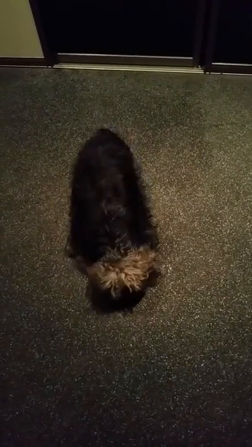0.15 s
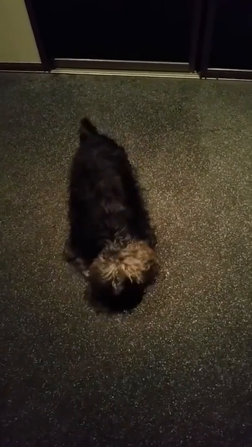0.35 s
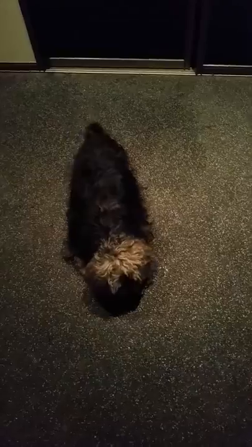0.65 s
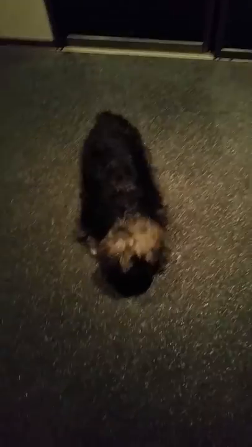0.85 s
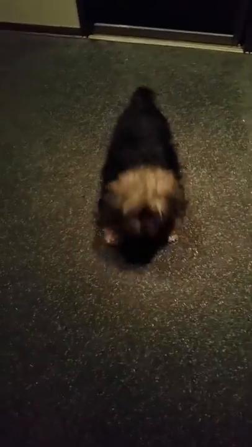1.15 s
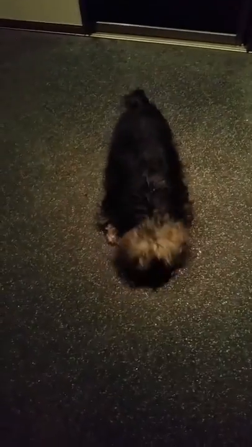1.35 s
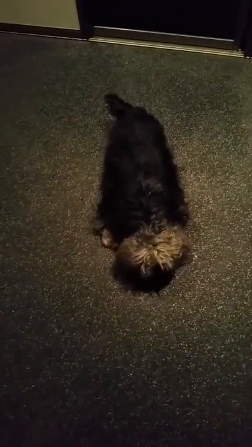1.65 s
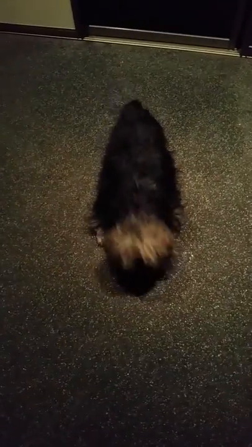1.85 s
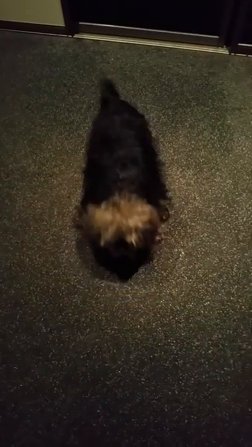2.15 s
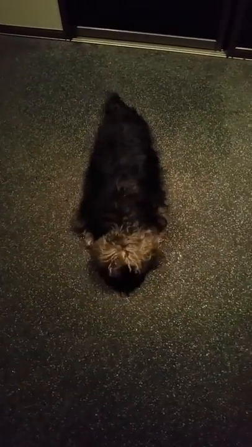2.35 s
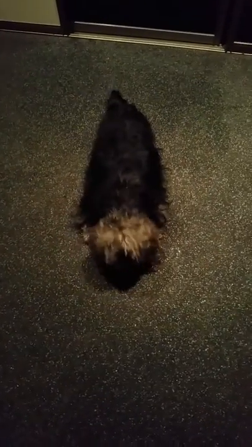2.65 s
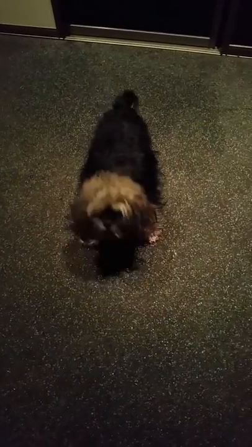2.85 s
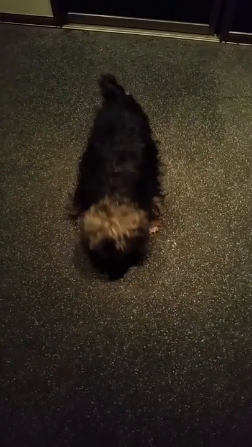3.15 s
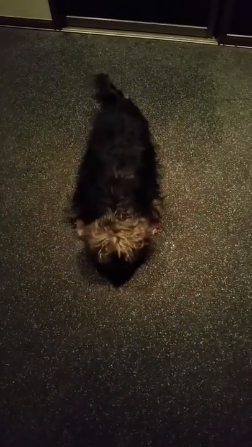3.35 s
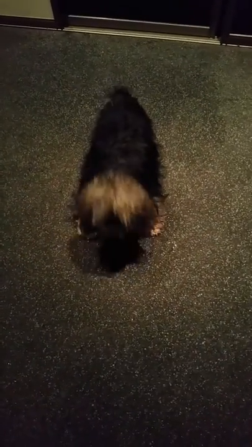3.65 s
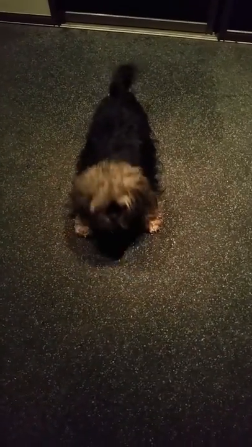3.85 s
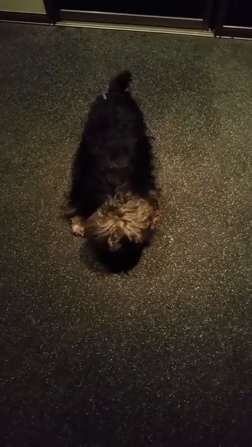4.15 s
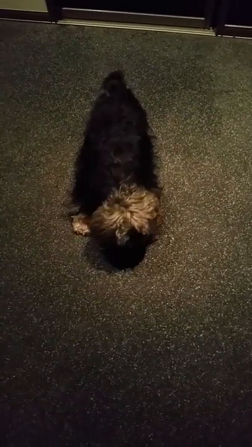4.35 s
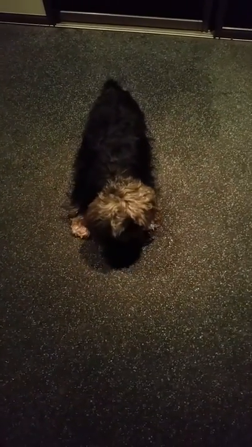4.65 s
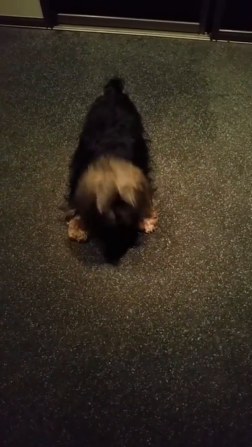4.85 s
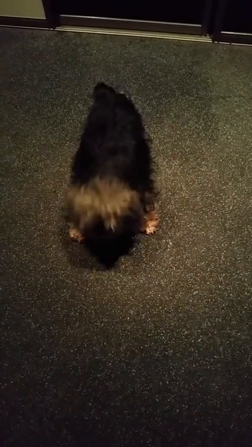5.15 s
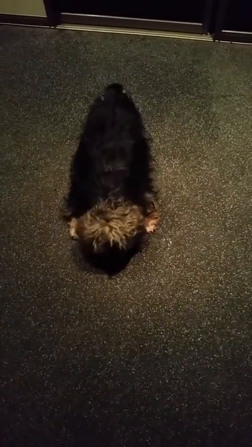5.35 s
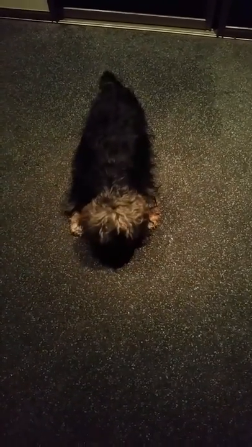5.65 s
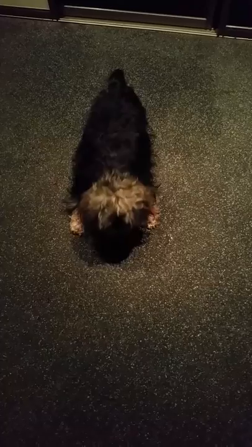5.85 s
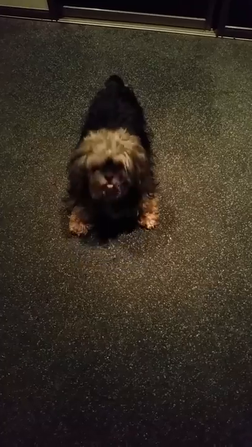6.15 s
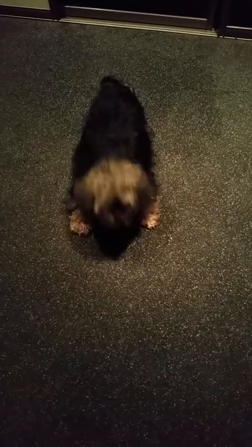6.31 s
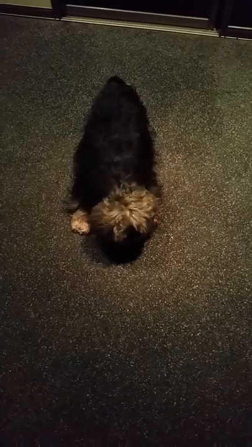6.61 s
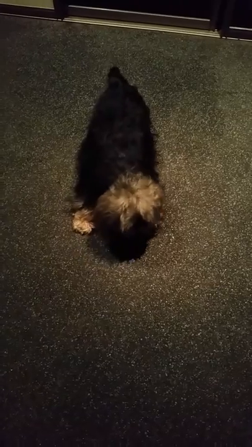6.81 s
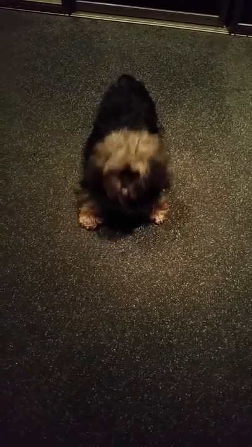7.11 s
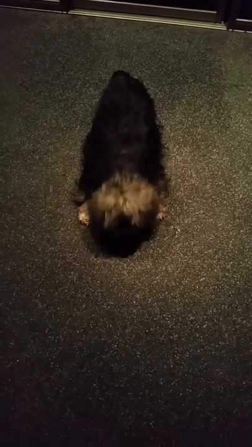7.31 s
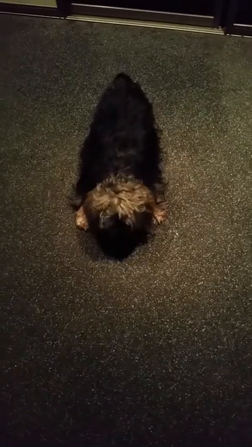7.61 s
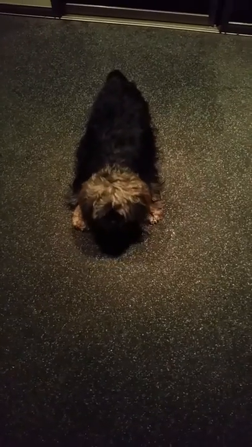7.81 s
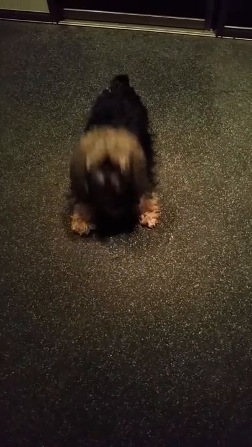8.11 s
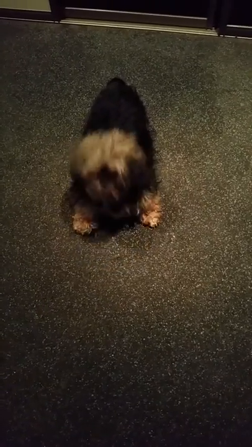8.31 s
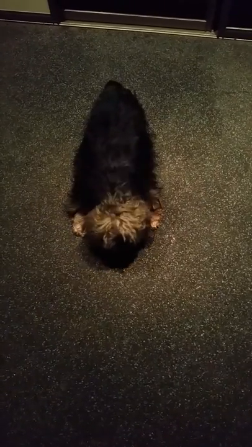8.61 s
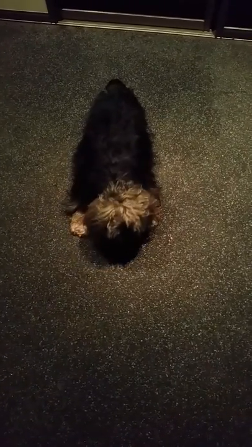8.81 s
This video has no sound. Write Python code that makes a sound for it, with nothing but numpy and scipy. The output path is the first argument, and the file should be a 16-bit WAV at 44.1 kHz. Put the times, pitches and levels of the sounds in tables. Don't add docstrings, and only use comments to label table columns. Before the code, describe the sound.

A small dog close by snorts and sniffs wetly, then lets out quick, thin whines around one second's start, sliding and nearly pure. Soft buzzy grunts and one sharper little yelp follow, with more whines in the middle and sparse fainter sounds at the end. The quiet hard hall rings briefly after each note. A hand-held stereo microphone with noise suppression lets low rumble swell with each burst.

```python
import sys
import numpy as np
from scipy import signal
from scipy.fft import rfft, irfft, next_fast_len
from scipy.io import wavfile
from scipy.ndimage import uniform_filter1d, map_coordinates

SR = 44100
rng = np.random.default_rng(int(sys.argv[2]) if len(sys.argv) > 2 else 0)


def volts(x):
    e = np.asarray(x, float) / 20
    return 10 ** e


def transcribe(u):
    v = np.clip(np.atleast_2d(u).T, -1, 1)
    q = np.round(v * 32767).astype(np.int16)
    wavfile.write(sys.argv[1], SR, q)


N = 395577
STEP = 16
SNORT_FALL_DB_PER_S = 228

# (time [s], length [s], closed level [dB], open level [dB])
GRUNTS = [
    (1.455, 0.05, -52, -59),
    (2.346, 0.048, -62.5, -50),
    (3.241, 0.053, -51.5, -35.5),
    (4.087, 0.053, -60, -46),
    (5.31, .053, -52, -59.5),
    (6.51, .075, -53, -50),
    (8.818, 0.055, -58, -56),
]
# (time [s], peak [dB], floor ring [Hz], length [s])
PAWS = [
    (2.63, -53.5, 162.2, 0.055),
    (6.388, -65, 206, 0.021),
]


def unit(x):
    return x / np.sqrt(np.mean(x ** 2) + 1e-20)


def along(points, hz):
    f, v = np.transpose(points)
    return np.interp(np.log(hz + 1), np.log(f + 1), v)


def wobble(rate):
    knots = rng.standard_normal(int(N * rate / SR) + 4)
    return map_coordinates(knots, [np.arange(N) * rate / SR])


def sides(db):
    return volts(np.array([db / 2, -db / 2]))


def rush(spectrum, balance, alike):
    m = next_fast_len(N)
    hz = np.fft.rfftfreq(m, 1 / SR)
    turn = np.arccos(np.clip(along(alike, hz), -1, 1)) / 2
    mid, side = rfft(rng.standard_normal((2, m))) * [np.cos(turn), np.sin(turn)]
    colour = volts(along(spectrum, hz)) * sides(along(balance, hz))
    pair = irfft(np.array([mid + side, mid - side]) * colour, m)[:, :N]
    return pair / np.std(pair.mean(0))


def mottled(x, depth_db):
    z = signal.stft(x, nperseg=512)[2]
    field = uniform_filter1d(rng.standard_normal(z.shape), size=5, axis=1)
    field = uniform_filter1d(field, size=8, axis=2)
    return unit(signal.istft(z * volts(depth_db * unit(field)), nperseg=512)[1][:, :N])


def burst(s, rise, hold, fall_db_per_s):
    rise_db = 20.5
    t = np.arange(0, N, STEP) / SR - s
    rise = max(rise, 1e-3)
    rising = -rise_db * np.clip(1 - t / rise, 0, 1)
    falling = -fall_db_per_s * np.clip(t - rise - hold, 0, None)
    return (t > 0) * volts(rising + falling)


def airflow():
    # (time [s], hold [s], hiss [dB], wheeze under the hiss [dB])
    snorts = [(-.01, 0.0081, -69.5, -22.5), (0.057, 0.0043, -53.5, -23.5), (.54, .13, -56, -24),
              (0.938, 0.027, -47, -16.5), (1.05, .005, -35.5, -17), (1.074, 0.0074, -35.5, -14.5),
              (1.338, 0.003, -75, -8), (1.481, 0.51, -68, -26), (1.709, .02, -44.5, -22),
              (1.751, 0.016, -44, -15.5), (2.316, 0.0046, -55, -20), (2.332, 0.026, -49, -15.5),
              (3.164, .004, -87.5, -25), (4.102, 0.098, -72, -24), (6.53, .02, -69.5, -40),
              (6.558, 0.12, -63, -38), (6.971, 0.1, -64.5, -27), (7.05, 0.033, -58, -25.5),
              (8.127, 0.053, -72.5, -30), (8.175, .1, -66, -25), (8.8, 0.043, -82, -24),
              (8.822, .11, -70.5, -27.5)]
    # (time [s], rise [s], hold [s], hiss [dB], wheeze under the hiss [dB])
    sniffs = [(0.128, 0.022, .02, -65.5, -19), (.36, .09, 0.012, -73, -30),
              (0.608, 0.13, .17, -48.5, -16.5), (2.402, 0.031, 0.11, -59, -18),
              (2.55, 0.063, 0.045, -66, -21.5), (3.22, .11, 0.024, -60, -17.5),
              (3.289, 0.081, .11, -54, -22), (4.17, 0.099, 0.071, -62, -19),
              (4.328, .03, 0.091, -57.5, -21.5), (4.538, 0.055, 0.058, -66, -24),
              (5.294, .11, 0.15, -68.5, -38), (5.489, 0.091, 0.11, -62, -33),
              (5.715, .03, 0.071, -58.5, -27), (6.361, 0.071, 0.0089, -87, -26.5),
              (6.62, .17, 0.14, -63, -33), (8.351, .04, 0.032, -79.5, -29), (8.622, .06, 0.009, -92.5, -25)]
    # (hiss [dB], nasal rush [dB])
    rush_law = [(-102, -95), (-78.5, -78), (-61.5, -73), (-28, -49)]
    snort_rise_s, sniff_fall_db_per_s = 0.02, 145
    linger_db, linger_db_per_s = -19, 50
    puff_db, puff_db_per_s = -40, 97.5

    hiss, wheeze, tight_db = volts(-106), volts(-105), -25
    breaths = [(SNORT_FALL_DB_PER_S, s, snort_rise_s, *rest) for s, *rest in snorts]
    breaths += [(sniff_fall_db_per_s, *row) for row in sniffs]
    for fall, s, rise, hold, db, wheeze_db in breaths:
        blow = volts(db) * burst(s, rise, hold, fall)
        heard = blow + volts(db + linger_db) * burst(s, rise, hold, linger_db_per_s)
        tight_db = np.where(heard > hiss, wheeze_db, tight_db)
        hiss = np.maximum(hiss, heard)
        wheeze = np.maximum(wheeze, volts(wheeze_db) * blow)
    hiss_db = 20 * np.log10(hiss)
    puffs = sum(volts(open_db + puff_db) * burst(s, length, 0, puff_db_per_s) for s, length, _, open_db in GRUNTS)
    rush_db = 20 * np.log10(volts(np.interp(hiss_db, *np.transpose(rush_law))) + puffs)
    return hiss_db, rush_db, 20 * np.log10(wheeze), tight_db


def nose(hiss_db, rush_db, wheeze_db, tight_db):
    # (frequency [Hz], density [dB per Hz])
    hard_hiss = [(8300, -68.5), (8900, -18.5), (10100, 1.5), (11200, 0.5), (12000, -5.5), (13000, -6),
                 (14200, -7), (14800, -12.5)]
    # (frequency [Hz], density [dB per Hz])
    soft_hiss = [(8300, -67.5), (8900, -18), (9500, -5), (10500, 4.5), (11500, -2), (12500, -5),
                 (14000, -21.5), (14800, -18.5)]
    # (frequency [Hz], density [dB per Hz])
    rush_colour = [(1100, -32), (1800, 4), (2400, -5.5), (2810, 0.5), (3200, -4.5), (3950, 6.5), (5300, -3),
                   (6200, -15.5), (6700, -57)]
    # (frequency [Hz], density [dB per Hz])
    wheeze_colour = [(4200, -40.5), (5300, -4.5), (6300, -8.5), (6740, -16), (7000, -6.5), (7300, -6),
                     (7900, -10.5), (8900, -4.5), (9500, -42)]
    # (frequency [Hz], left-right [dB])
    nose_sides = [(2000, -3), (3000, 5.5), (4400, 6), (6000, -9), (8000, -6), (10500, 0), (14000, -1)]
    # (time [s], peak [dB], left-right [dB])
    smacks = [(0.0524, -77, -3), (0.0591, -31.5, -11), (0.064, -44, -15), (0.0714, -55, -3),
              (0.0954, -55, -4), (0.9667, -49, -2.5), (0.9881, -45, -8.5), (1.7144, -70, -7),
              (1.717, -34, -3), (2.3307, -45, 14), (1.349, -49, -3), (6.976, -46.5, 1), (3.1732, -57.5, -9)]
    apart = [(1000, 0.0058)]

    spit = volts(1.0 * wobble(900) + 0.52 * wobble(65))
    tightness = uniform_filter1d(tight_db + 27, size=900) / 22
    force = np.clip(0.65 + (hiss_db + 59.5) / 60 + tightness, 0, 1)
    hiss = force * rush(hard_hiss, nose_sides, apart)
    hiss += np.sqrt(1 - force ** 2) * rush(soft_hiss, nose_sides, apart)
    air = volts(hiss_db + 1.0) * mottled(spit * hiss, depth_db=4.0)
    air += volts(rush_db + 2.2 * wobble(40)) * rush(rush_colour, nose_sides, apart)
    air += volts(wheeze_db + 5.5) * mottled(rush(wheeze_colour, nose_sides, apart), depth_db=4.5)
    t = np.arange(130) / SR
    for s, db, pan_db in smacks:
        tick = volts(db - 3.0 - 60 * t / 0.0075) * np.sin(2 * np.pi * 10500 * t)
        air[:, round(s * SR):][:, :len(t)] += tick * sides(pan_db)[:, None]
    return air


def opening(rush_db):
    # (nasal rush [dB], rumble let through [dB])
    rumble_law = [(-104, -75), (-75, -63.5), (-67, -57.5), (-54, -55)]
    opening_s, paw_opens_db = 0.061, -23
    presses = sum(volts(db + paw_opens_db) * burst(s, 0.0039, length, SNORT_FALL_DB_PER_S)
                  for s, db, _, length in PAWS)
    busy_db = 20 * np.log10(volts(rush_db) + presses)
    busy_db = uniform_filter1d(busy_db, size=max(1, round(opening_s * SR / STEP)))
    return np.interp(busy_db, *np.transpose(rumble_law))


def background(rumble_db):
    # (frequency [Hz], density [dB per Hz])
    quiet = [(22, -15.5), (36, -13), (60, -8), (125, -9.5), (208, -12.5), (600, -14.5), (1270, -39.5),
             (1900, -32), (2450, -44), (3950, -24), (5200, -40.5), (7800, -66), (10500, -46), (14800, -50)]
    # (frequency [Hz], left-right [dB])
    quiet_sides = [(60, -1.5), (110, 5), (200, -0.5), (380, 0), (700, 5.5), (1290, -7.5), (2380, 21),
                   (4400, 15), (8120, 8.5), (15000, 15.5)]
    # (frequency [Hz], density [dB per Hz])
    rumble_colour = [(32, -52), (55, 0), (123, -4.5), (210, -3), (448, -7.5), (486, -6), (681, -9),
                     (1110, -14.5), (1500, -21), (2600, -33), (3380, -17), (5720, -120)]
    # (frequency [Hz], left-right likeness [-1..1])
    alike = [(60, 0.87), (240, 0.38), (950, 0.22), (3770, 0.01), (15000, -0.14)]
    # (frequency [Hz], width [Hz], level [dB],
    # left-right [dB])
    narrow_bands = [(206.1, 11, -80.5, -3), (1845, 140, -95, 4), (4020, 300, -83.5, 20.5),
                    (12600, 200, -99, 0)]
    hum_hz, hum_level_db, hum_follows, hum_wander_db = 46, -71, 0.43, 2
    quiet_db = -66

    hum_db = hum_level_db + hum_follows * (rumble_db - rumble_db.mean()) + hum_wander_db * wobble(5)
    hum_phase = 2 * np.pi * np.cumsum(hum_hz * (1 + 0.023 * wobble(1.7))) / SR
    hum = np.sin(hum_phase + 0.5 * np.array([wobble(1.8), wobble(1.5)]))
    port_drift_db = 1.5 * np.array([wobble(12.0), wobble(16.0)])
    hum = volts(hum_db + 5.0 + port_drift_db) * hum * sides(-2.1)[:, None]

    still = volts(quiet_db - 6.5) * rush(quiet, quiet_sides, alike)
    rumble = volts(rumble_db - 2.0) * rush(rumble_colour, [(100, -7.0), (1000, 6.5)], alike)
    drones = 0
    for hz, w, db, pan_db in narrow_bands:
        band = [(hz - 3 * w, -120), (hz - 2 * w, -30), (hz, 0), (hz + 2 * w, -30), (hz + 3 * w, -120)]
        drones = drones + volts(db) * rush(band, [(hz, pan_db)], alike)
    return still + rumble + volts(0.59 * (rumble_db + 72.5)) * drones + hum


def hall(x, gap):
    # (frequency [Hz], t60 [s])
    decay = [(300, 0.61), (1200, 0.73), (4000, 0.37), (12000, 0.6)]
    # (hold [s], fall [s], depth [dB])
    closing = (0.033, 0.12, -14)
    hz, t, z = signal.stft(rng.standard_normal((2, SR // 2)), SR, nperseg=256)
    tail = signal.istft(z * volts(-60 * t / along(decay, hz)[:, None]), SR, nperseg=256)[1]
    late = np.pad(x, (round(gap * SR), 0))
    echo = signal.fftconvolve(late[None], tail / np.linalg.norm(tail[0]), axes=1)
    hold, fall, depth_db = closing
    after = (np.arange(echo.shape[1]) - len(x)) / SR - hold
    return echo * volts(depth_db * np.clip(after / fall, 0, 1))


def calls(notes, poses, overtones, colour, jitter, lag):
    out, shake, flutter = np.zeros((2, N + SR)), wobble(300), wobble(500)
    for note, (*_, pan_db, bright_db, wet_db) in zip(notes, poses):
        s, hz, db, roughness, flare_db, octave_db = np.transpose(note)
        start = round(s[0] * SR)
        t = np.arange(start, round(s[-1] * SR) + 260) / SR
        here = slice(start, start + len(t))
        rough = np.clip(np.interp(t, s, roughness), 0, 1)
        pitch = np.interp(t, s, hz) * (1 + jitter * rough * shake[here])
        phase = 2 * np.pi * np.cumsum(pitch) / SR
        edges = np.clip((t - t[0]) / 0.0057, 0, 1) * np.clip((t[-1] - t) / 0.0078, 0, 1)
        shape = np.sqrt(2) * volts(np.interp(t, s, db)) * edges * (1 - rough + rough * flutter[here])
        overtone_db = bright_db + np.interp(t, s, flare_db)
        direct = np.zeros((2, len(t)))
        for k, g in enumerate(overtones, 1):
            gain_db = g + overtone_db * (k > 1) + octave_db[0] * (k == 2) + along(colour, k * pitch)
            direct += shape * volts(gain_db) * np.sin(k * (phase + np.array([[-lag], [lag]])))
        echo = volts(wet_db) * hall(direct[0], gap=.006)
        echo[:, :len(t)] += direct
        out[:, start:start + echo.shape[1]] += echo * sides(pan_db)[:, None]
    return out[:, :N]


def whine(row, pose):
    slide_from, dip_from, dip_to = 0.26, .5, .75
    early_slide, leaving_db = 0.21, -9.5
    (s, length, first, dip, last), (first_db, last_db) = row, pose[:2]
    shares = np.array([0, slide_from, dip_from, dip_to, 1])
    pitch = [first, first + early_slide * (dip - first), dip, dip, last]
    level = np.interp(shares, [0, dip_to, 1], [first_db, last_db, last_db + leaving_db])
    return np.transpose([s + length * shares, pitch, level, 0 * shares + 0.064, 0 * shares, 0 * shares])


def whines():
    # (time [s], length [s], first pitch [Hz], pitch at the dip [Hz], last pitch [Hz])
    whistles = [(0.387, 0.037, 980, 1147, 1155), (0.501, 0.06, 1160, 1240, 1310),
                (0.576, 0.065, 1414, 1317, 1460), (0.705, 0.068, 1437, 1043, 1500),
                (0.833, 0.057, 1462, 1132, 1343), (1.607, 0.0485, 1150, 1041, 1275),
                (1.726, .046, 1574, 1134, 1462), (4.246, 0.056, 1403, 1356, 1410),
                (4.383, 0.05, 1420, 1382, 1370), (4.592, 0.037, 1370, 1273, 1277),
                (5.527, .046, 1276, 1242, 1266), (5.651, 0.06, 1332, 1177, 1170),
                (5.75, .056, 1258, 937, 885), (5.936, .02, 975, 1024, 1010),
                (6.855, 0.013, 1165, 1162, 1190), (6.884, .016, 1166, 1138, 1100)]
    # (first level [dB], last level [dB], left-right [dB], overtones [dB], hall [dB])
    poses = [(-66, -59.5, -5.5, -20.5, 2), (-59.5, -66.5, -4, -18, 3.5), (-51, -42, -9, -5, -0.5),
             (-34.5, -41, -9.5, -2, 0.5), (-36, -31.5, -9, 3.5, -2.5), (-51, -39.5, -4, -11, -2),
             (-53, -30.5, -6, 7.5, -1.5), (-48, -41.5, -6, -3, -3.5), (-36.5, -31, -6.5, -12, -8.5),
             (-52.5, -41, -3.5, -6, -1.5), (-58.5, -47, -11, -19, -3), (-57, -42.5, -8.5, -14, 0.5),
             (-44, -44.5, -5, -1, -0.5), (-44.5, -47.5, -2, -7, -3.5), (-61, -57, -3, -30, -7),
             (-51, -52.5, -7, -22, 1)]
    overtones = [-0.5, -16.5, -29, -30.5]
    # (frequency [Hz], gain [dB])
    snout = [(1000, -0.5), (1900, 4), (2300, -9), (2800, -7.5), (4500, 1.5)]
    return calls(map(whine, whistles, poses), poses, overtones, snout, jitter=0.23, lag=0.61)


def grunt(row, pitch, octave_db):
    jaw_loosens, jaw_open = .55, .76
    swell_db_per_octave = 60
    s, length, closed_db, open_db = row
    first_db = closed_db - swell_db_per_octave * np.log2(pitch[1] / pitch[0])
    times = s + length * np.array([0, jaw_loosens, jaw_open, 1])
    level = [first_db, closed_db, open_db, open_db]
    roughness = [.06, .06, .35, .4]
    flare_db = [0, 3.5, 2.5, -14]
    return np.transpose([times, pitch, level, roughness, flare_db, 4 * [octave_db]])


def grunts():
    # (first [Hz], as the jaw loosens [Hz], jaw open [Hz], last [Hz])
    pitches = [(612, 630, 800, 960), (600, 700, 920, 960), (635, 745, 880, 960), (680, 735, 860, 980),
               (510, 575, 650, 555), (345, 440, 565, 555), (535, 500, 595, 545)]
    octaves_db = [-2, 4, -8, 3.5, -3, 1.5, 0]
    # (left-right [dB], overtones [dB], hall [dB])
    poses = [(-5, -13.5, 2.5), (-7.5, -9, 1), (-7, 5, 0), (-5, 0.5, 0.5), (-6, -10, 3.5), (-4.5, -11.5, 1),
             (-6, -11, 2)]
    overtones = [0.5, 0, -3.5, -17.5, -15.5, -26.5]
    # (frequency [Hz], gain [dB])
    throat = [(300, 8), (900, 0), (1350, 9), (1700, -1), (2300, -8.5), (3100, -8.5), (4200, 5), (4800, -49)]
    notes = map(grunt, GRUNTS, pitches, octaves_db)
    return calls(notes, poses, overtones, throat, jitter=0.14, lag=0.14)


def paws():
    out = np.zeros((2, N))
    for s, db, hz, length in PAWS:
        t = np.arange(round(length * SR)) / SR
        note = np.sin(2 * np.pi * hz * t) + 0.33 * np.sin(2 * 2 * np.pi * hz * t)
        note *= volts(db + 7.5) * np.sin(np.pi * t / length) ** 0.063
        out[:, round(s * SR):][:, :len(t)] += note * sides(-2.7)[:, None]
    return out


def scene():
    def every_sample(levels):
        return np.repeat(levels, STEP, axis=1)[:, :N]

    flow = airflow()
    hall_noise = background(*every_sample([opening(flow[1])]))
    return nose(*every_sample(flow)) + hall_noise + whines() + grunts() + paws()


def band_limit(x):
    return signal.sosfilt(signal.butter(12, 15680, fs=SR, output="sos"), x)


def record(dry):
    # (from [Hz], to [Hz], level under the hiss [dB])
    masked = (5900, 9300, -16)
    top_hz = 14600
    hz, _, z = signal.stft(dry, SR, nperseg=2048)
    power = uniform_filter1d(np.abs(z) ** 2, size=14, axis=1)
    low_hz, high_hz, under_db = masked
    mask = power[:, hz > high_hz][:, :200].mean(1, keepdims=True) * volts(2 * under_db)
    weak = (power < mask) & ((hz > low_hz) & (hz < high_hz))[:, None]
    kept = signal.istft(z * ~weak * (hz < top_hz)[:, None], SR, nperseg=2048)[1][:, :N]
    return band_limit(kept)


dry = scene()
out = record(dry)
transcribe(out)
```